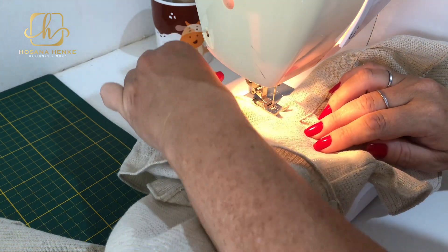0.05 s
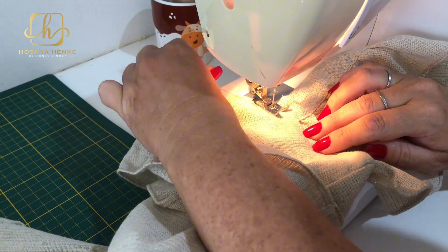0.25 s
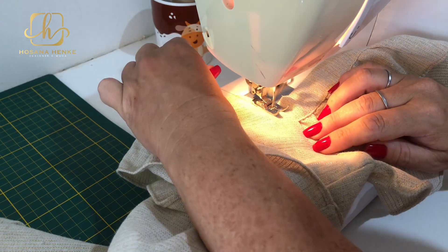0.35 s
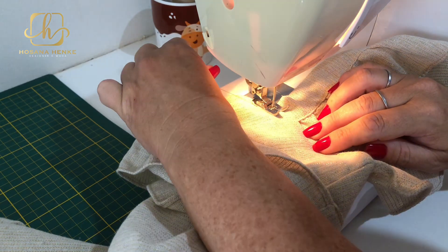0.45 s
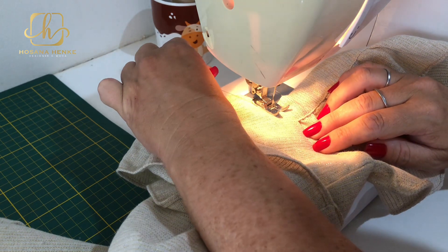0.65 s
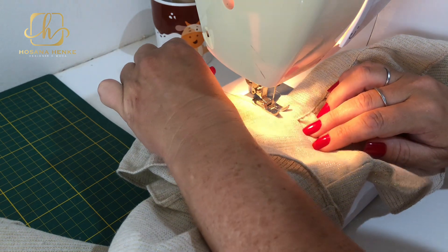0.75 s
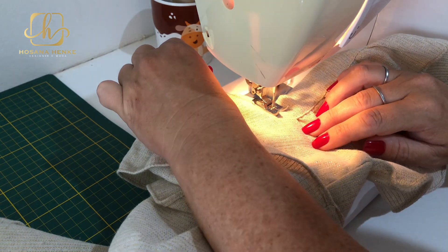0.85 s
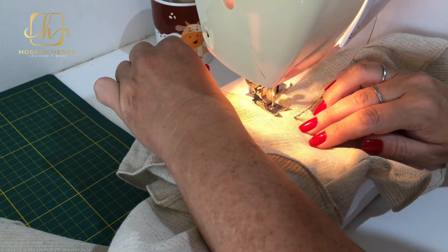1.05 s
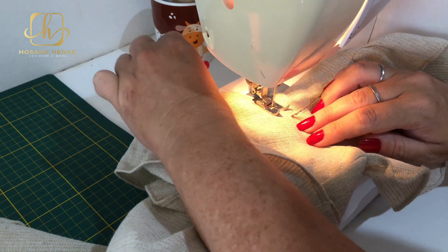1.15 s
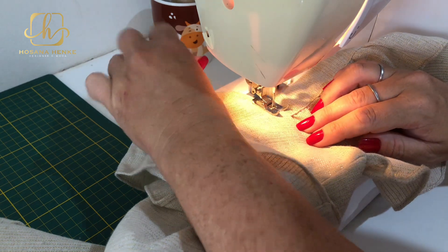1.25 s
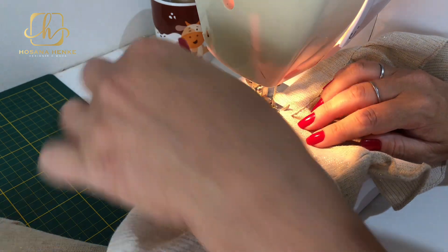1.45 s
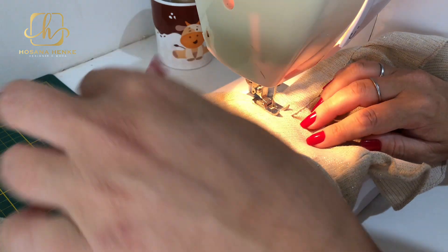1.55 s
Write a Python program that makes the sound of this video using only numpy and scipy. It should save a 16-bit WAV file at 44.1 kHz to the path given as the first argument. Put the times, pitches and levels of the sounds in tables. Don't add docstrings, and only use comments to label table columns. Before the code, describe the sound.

A sewing machine, close to a phone microphone in a small room, clicks into motion, rattles through a short burst, drops to a faint whir, then clatters through a longer burst and coasts to a stop.

```python
import sys
import numpy as np
from scipy import signal
from scipy.fft import rfft, irfft, next_fast_len
from scipy.io import wavfile
from scipy.ndimage import map_coordinates

SR = 44100
rng = np.random.default_rng(int(sys.argv[2]) if len(sys.argv) > 2 else 0)


def natural_amplitude(level_db):
    exponent = np.asarray(level_db, float) / 20
    return 10 ** exponent


def put_to_file(sound):
    columns = np.atleast_2d(sound).T
    safe = np.clip(columns, -1, 1)
    whole_steps = np.round(safe * 32767)
    wavfile.write(sys.argv[1], SR, whole_steps.astype(np.int16))


N = 70560
NOW = np.arange(N) / SR


def unit(x):
    return x / np.sqrt(np.mean(x ** 2) + 1e-20)


def along(points, hz):
    f, v = np.transpose(points)
    return np.interp(np.log(hz + 1), np.log(f + 1), v)


def wobble(rate):
    knots = rng.standard_normal(int(N * rate / SR) + 4)
    return map_coordinates(knots, [np.arange(N) * rate / SR])


def wavering(hz, waver_hz, rate):
    pitch_hz = hz + waver_hz * wobble(rate)
    return np.sqrt(2) * np.sin(2 * np.pi * np.cumsum(pitch_hz) / SR)


def filtered(x, response):
    m = next_fast_len(N + SR // 2)
    return irfft(rfft(x, m) * response(np.fft.rfftfreq(m, 1 / SR)), m)[..., :N]


def resonances(modes):
    def response(f):
        total = 0
        for k, (centre, width, db) in enumerate(modes):
            damping = 1j * f * width
            total = total + (-1) ** k * natural_amplitude(db) * damping / (centre ** 2 - f * f + damping)
        return total
    return response


def coloured(spectrum):
    return unit(filtered(rng.standard_normal(N), lambda hz: natural_amplitude(along(spectrum, hz))))


CHATTER_S, REBOUND_DB, NOTE_SCATTER_DB = .007, -8, 2.5


def struck(events, notes, own_t60, crack_db, crack_t60, crack_band, rise_s, count):
    out, t = np.zeros(N + SR), np.arange(SR // 5) / SR
    for s, db, own_hz in events:
        ring = natural_amplitude(-60 * t / own_t60) * np.sin(2 * np.pi * own_hz * t)
        for hz, level, t60 in notes:
            note_db = level + NOTE_SCATTER_DB * rng.standard_normal()
            ring = ring + natural_amplitude(note_db - 60 * t / t60) * np.sin(2 * np.pi * hz * t)

        band_hz = np.clip(np.multiply(crack_band, own_hz), 300, 19000)
        sos = signal.butter(2, band_hz, "bandpass", fs=SR, output="sos")
        noise = unit(signal.sosfilt(sos, rng.standard_normal(len(t))))
        crack = natural_amplitude(crack_db - 60 * t / crack_t60) * noise

        contacts = np.zeros(SR // 20)
        lag_s = np.clip(np.abs(rng.standard_normal(count)) * CHATTER_S / 2, .001, .04)
        rebounds = natural_amplitude(REBOUND_DB + 2 * rng.standard_normal(count))
        np.add.at(contacts, (lag_s * SR).astype(int), rebounds)
        contacts[0] = 1
        hit = signal.fftconvolve((ring + crack) * (1 - np.exp(-t / rise_s)), contacts)
        out[round(s * SR):][:len(hit)] += natural_amplitude(db) * hit / np.abs(hit).max()
    return out[:N]


# pitch_hz, level_db (per Hz)
ROOM_TONE = [(30, 13), (150, 9.5), (280, -0.5), (470, 9.5), (650, -0.5), (1800, -5), (4000, -24),
             (16000, -39)]
# pitch_hz, level_db (per Hz)
MIC_HISS = [(1500, -23), (3900, 0), (8000, -10), (13000, -9), (16000, -2)]
ROOM_TONE_DB, MIC_HISS_DB, HUM_HZ, HUM_DB = -60, -70.5, 100, -59


def background():
    hum = natural_amplitude(HUM_DB + 1.2 * wobble(12)) * wavering(HUM_HZ, .6, rate=8)
    tone = natural_amplitude(ROOM_TONE_DB - 5.4 * NOW + 1.2 * wobble(15)) * coloured(ROOM_TONE)
    hiss = natural_amplitude(MIC_HISS_DB - 5.3 * NOW) * coloured(MIC_HISS)
    return hum + tone + hiss


# start_s, peak_db, pitch_hz
TICKS = [(.285, -62, 6230), (.305, -53, 14400), (.352, -45, 7100), (.4028, -32, 5160), (.438, -41, 15200),
         (.45, -34.5, 5820), (.461, -37.5, 7760), (.485, -46, 14300), (.662, -60, 3180),
         (.705, -36.5, 4700), (.744, -31, 4620), (.755, -40.5, 11900), (.791, -37.5, 11000),
         (.807, -43, 8400), (.8655, -35, 2950), (.953, -35, 5700), (.966, -33.5, 4830), (.991, -33, 10500),
         (1.053, -31, 15400), (1.08, -35, 8390), (1.138, -36, 4310), (1.146, -30.5, 4830),
         (1.173, -31, 15800), (1.218, -38, 6250), (1.26, -34.5, 5310), (1.285, -42.5, 10640),
         (1.383, -52, 8540), (1.495, -66, 15200), (1.517, -63, 7500), (.211, -56, 8000),
         (.2228, -45.5, 7780), (.387, -55, 13000), (.56, -50, 8700), (.87, -34, 4300), (.908, -42, 14500),
         (.922, -45, 8900), (1.003, -40, 5540), (1.048, -38, 4860), (1.064, -40, 6150), (1.088, -49, 7960),
         (1.164, -38, 9100), (1.19, -38.5, 2880), (1.247, -47, 4800), (.748, -40, 4830), (.78, -43, 2740),
         (.97, -32, 4440), (1.15, -29, 4350), (1.149, -38, 3120), (.776, -35, 2960)]
# pitch_hz, level_db, t60_s
STEEL_NOTES = [(4830, -10, .03), (4390, -12, .025), (3000, -14, .02), (6200, -19, .02), (8060, -18, .018),
               (10400, -20, .015), (15400, -18, .015)]


def ticks():
    return struck(TICKS, STEEL_NOTES, own_t60=.022, crack_db=-5, crack_t60=.022,
                  crack_band=(.5, 2.0), rise_s=.001, count=3)


# start_s, level_db (rms), t60_s
PEDAL = [
    (0.212, -44.5, 0.085),
    (0.2228, -44.5, 0.31),
    (1.444, -53, 0.3),
]
# pitch_hz, width_hz, level_db
PEDAL_BOX = [(340, 60, -6), (490, 40, 0), (770, 70, 1), (1250, 200, -5), (1550, 150, -3), (2300, 400, -9),
             (3300, 600, -10), (6000, 2000, -25), (13500, 4000, -28)]
# pitch_hz, level_db, t60_s
CLUTCH_RING = [(490, -45, .22), (760, -43, .12), (1550, -48, .08)]
POP_S, POP_DB, POP_WIDTH_S = .2906, -30, .00022
CLICK_S, CLICK_DB, CLICK_T60 = 1.539, -51, .005


def pedal():
    scrape = 0
    for s, db, t60 in PEDAL:
        scrape = scrape + (NOW >= s) * natural_amplitude(db - 60 * np.clip(NOW - s, 0, None) / t60)
    noise, box = rng.standard_normal(N), resonances(PEDAL_BOX)
    boxed = filtered(scrape * noise * natural_amplitude(1.9 * wobble(250)), box) / np.std(filtered(noise, box))

    since_grip = np.clip(NOW - PEDAL[1][0], 0, None)
    plate = 0
    for hz, db, t60 in CLUTCH_RING:
        plate = plate + natural_amplitude(db - 60 * since_grip / t60) * np.sin(2 * np.pi * hz * since_grip)

    pop = natural_amplitude(POP_DB) * np.exp(-((NOW - POP_S) / POP_WIDTH_S) ** 2)
    since_click = np.clip(NOW - CLICK_S, 0, None)
    click = (since_click > 0) * natural_amplitude(CLICK_DB - 60 * since_click / CLICK_T60)
    click = click * coloured([(1500, 3), (4000, 11), (15000, 8)])
    return boxed + plate + pop + click


# start_s, running_db, extra_brush_hiss_db
DRIVE = [(0, -103, -8), (.27, -70, 11), (.29, -53, 4), (.4, -45, 2), (0.486, -48.5, 8), (0.516, -58, 9.5),
         (.588, -60.5, 12.5), (.635, -66.5, 4), (.682, -60, 6.5), (0.734, -48, 2.5), (.76, -46, 3),
         (.93, -47, 10.5), (1.08, -43, 5.5), (1.118, -48, 10), (1.187, -42, -1.5), (1.288, -52.5, 9.5),
         (1.42, -64, 1.5), (1.6, -83.5, 6)]
# pitch_hz, width_hz, level_db
HOUSING = [(669, 79, 5), (926, 65, 6), (1107, 158, 2.5), (1430, 390, -2.5), (1827, 227, -1.5),
           (2960, 100, -12.5), (4830, 68, -27), (6420, 51, -13), (8100, 240, -14), (10200, 210, -21),
           (15400, 320, -18)]
# pitch_hz, width_hz, level_db
BED = [(170, 33, -5), (278, 10.6, -4.5), (341, 36, -8.5), (432, 28, -6), (520, 58, -13), (580, 51, -10)]
# pitch_hz, level_db (per Hz)
WHIR = [(100, -46), (180, 3), (700, 1), (1200, -12.5), (2430, -10), (5000, -28), (9000, -25), (16000, -89)]
# pitch_hz, level_db (per Hz)
BRUSHES = [(1200, -6), (2500, 2.5), (5000, 4.5), (9000, -6.5), (14300, -2.5), (15400, 0.5), (16000, 1)]
RATTLE_PER_S, RATTLE_SCATTER_DB = 1500, 4
RATTLE_DB, BED_DB, WHIR_DB, HISS_DB = 1, -4, 2.5, -8
WHINE_HZ, WHINE_WAVER_HZ, WHINE_DB = 3470, 65, -8
WHINE_FROM_S, WHINE_TO_S = .78, 1.22


def shaken(taps, modes):
    body = resonances(modes)
    return filtered(taps, body) / np.std(filtered(rng.standard_normal(N), body))


def running():
    s, *cols = np.transpose(DRIVE)
    drive_db, bright_db = [np.interp(NOW, s, c) for c in cols]

    taps = (rng.random(N) < RATTLE_PER_S / SR) * rng.choice([-1, 1], N)
    taps = taps * natural_amplitude(RATTLE_SCATTER_DB * rng.standard_normal(N))
    taps = taps * natural_amplitude(drive_db) * np.sqrt(SR / RATTLE_PER_S)
    rattle = shaken(taps, HOUSING) * natural_amplitude(RATTLE_DB + wobble(30.36))
    rattle = rattle + shaken(taps, BED) * natural_amplitude(BED_DB + 4.2 * wobble(20))

    outside = (NOW < WHINE_FROM_S) | (NOW > WHINE_TO_S)
    whine_db = drive_db + WHINE_DB + 3 * wobble(110) - 6 * outside
    whine = natural_amplitude(whine_db) * wavering(WHINE_HZ, WHINE_WAVER_HZ, rate=120)
    whir = natural_amplitude(drive_db + WHIR_DB + wobble(44.54)) * coloured(WHIR)
    hiss = natural_amplitude(drive_db + bright_db + HISS_DB + 1.2 * wobble(120)) * coloured(BRUSHES)
    return rattle + whine + whir + hiss


# start_s, peak_db, pitch_hz (loudest housing note)
KNOCKS = [(.283, -32.5, 1014), (.353, -24.5, 1073), (.405, -33.5, 1900), (.438, -26, 645), (.478, -31, 655),
          (.687, -40, 1940), (.705, -32, 1884), (.741, -24, 640), (.772, -25.5, 1470), (.8065, -24.5, 998),
          (.8655, -25, 999), (.925, -32, 1920), (.964, -17, 673), (1.005, -24.5, 1142), (1.0485, -21, 698),
          (1.066, -25, 603), (1.082, -38, 930), (.882, -23, 730), (.985, -23, 890), (1.175, -25, 1020),
          (.455, -34.5, 790), (.372, -33, 1080), (.658, -41, 900), (1.26, -33, 2310), (.356, -26, 1143),
          (.746, -24.5, 1093), (.809, -25, 660), (.84, -37, 680), (1.051, -27, 1120), (1.058, -33, 900),
          (1.345, -46.5, 790), (1.4, -45.5, 730), (1.41, -46, 1110), (1.447, -48.5, 1170),
          (1.465, -46, 512), (1.119, -27.5, 860), (1.143, -19, 673), (1.165, -21, 760), (1.185, -24, 1037),
          (1.215, -57, 740), (1.238, -21.5, 694), (1.291, -33, 1160), (1.392, -39, 675)]
# pitch_hz, level_db, t60_s
KNOCK_NOTES = [(650, -14, .045), (1130, -13, .03), (1500, -14, .025), (1850, -14, .03), (2600, -17, .02),
               (800, -14, .04)]


def knocks():
    return natural_amplitude(-4.5) * struck(KNOCKS, KNOCK_NOTES, own_t60=0.032, crack_db=-14.5, crack_t60=0.049,
                              crack_band=(1.1, 6.5), rise_s=0.00095, count=3)


# start_s, level_db, pitch_hz
SHUDDERS = [(0.309, -45, 114), (0.393, -44, 123.7), (0.464, -44.5, 100), (0.558, -53, 100),
            (0.698, -52.5, 116.2), (0.758, -47, 119.5), (0.828, -41.5, 116.3), (0.908, -47.5, 124),
            (0.967, -44, 100), (1.018, -43, 117), (1.063, -44.5, 138.3), (1.151, -46, 100),
            (1.198, -46.5, 130.4), (1.271, -45.5, 103.9), (1.36, -56.5, 129), (1.449, -64, 120.6),
            (1.508, -84, 100), (0.428, -54, 169.3), (1.4, -69, 175), (.295, -48.5, 414), (0.411, -57, 432),
            (0.474, -47, 445.7), (.865, -48, 421), (0.969, -46, 433), (1.034, -46, 432), (1.074, -42, 429),
            (1.141, -49, 434), (1.231, -58, 419), (0.296, -55, 279), (.375, -52.5, 270), (0.459, -55, 275),
            (0.746, -55, 277), (.885, -45, 278), (1.046, -52.5, 276), (1.141, -61, 277), (1.355, -69, 288),
            (0.322, -49.5, 177), (.77, -66, 172), (0.859, -48, 172), (1.039, -50, 166.4),
            (1.161, -48, 180.5), (.405, -54, 520), (.46, -50, 347), (1.281, -55.5, 339.5), (1.045, -53, 55)]
# start_s, end_s, level_db
SWAY = [
    (0.347, 0.43, -42.5),
    (0.746, 0.997, -46),
    (1.126, 1.297, -45.5),
    (1.328, 1.395, -54),
    (0.526, 0.707, -58.5),
    (1.477, 1.598, -63),
]
SHUDDER_RISE_S, SHUDDER_T60, SHUDDER_AT_HZ = .013, .24, 120
SWAY_HZ, SWAY_WAVER_HZ, SWAY_EDGE_S = 66, 9, .03


def table():
    out, t = np.zeros(N + SR), np.arange(SR // 2) / SR
    rise = 1 - np.exp(-(t / SHUDDER_RISE_S) ** 2)
    for s, db, hz in SHUDDERS:
        fall_db = 60 * t / SHUDDER_T60 * np.sqrt(hz / SHUDDER_AT_HZ)
        boom = natural_amplitude(db + 17 - fall_db) * rise * np.sin(2 * np.pi * hz * t)
        out[round(s * SR):][:len(t)] += boom

    gate = 0
    for start, end, db in SWAY:
        away_s = np.clip(np.maximum(start - NOW, NOW - end), 0, None)
        gate = gate + natural_amplitude(db) * np.exp(-(away_s / SWAY_EDGE_S) ** 2)
    sway = gate * natural_amplitude(0.5 * wobble(28.8)) * wavering(SWAY_HZ, SWAY_WAVER_HZ, rate=11.24)
    return out[:N] + sway


# pitch_hz, t60_s
WALLS = [(100, 1), (1000, 0.043), (5000, 0.13), (15000, 0.16)]
WALLS_DB = -10.5


def walls(x):
    hz, t, z = signal.stft(rng.standard_normal(SR // 2), SR, nperseg=256)
    fade = natural_amplitude(-60 * t / along(WALLS, hz)[:, None])
    tail = signal.istft(z * fade, SR, nperseg=256)[1]
    return signal.fftconvolve(np.pad(x, (300, 0)), tail / np.linalg.norm(tail))[:N]


def scene():
    machine = ticks() + pedal() + running() + knocks()
    return (machine + natural_amplitude(WALLS_DB) * walls(machine) + table() + background())[None]


def top_cut(x):
    return signal.sosfilt(signal.butter(12, 16180, fs=SR, output="sos"), x)


MIC_LOW_HZ, TOP_HZ = 60.5, 15800


def record(dry):
    mix = filtered(dry, lambda hz: (hz < TOP_HZ) / (1 + (MIC_LOW_HZ / (hz + 1)) ** 4))
    return top_cut(mix)


dry = scene()
out = record(dry)
put_to_file(out)
```